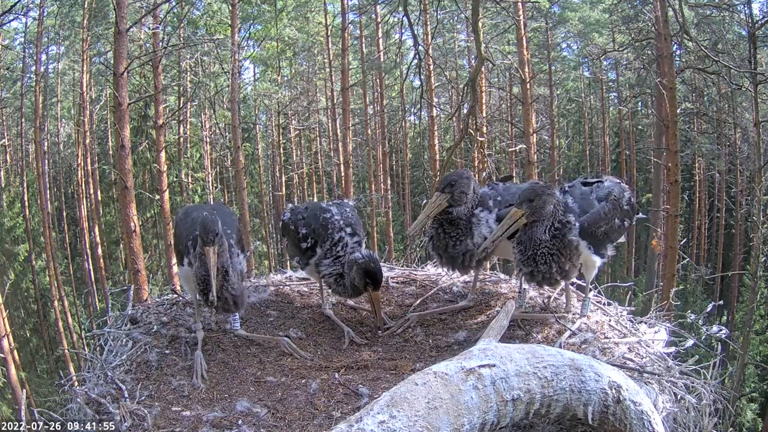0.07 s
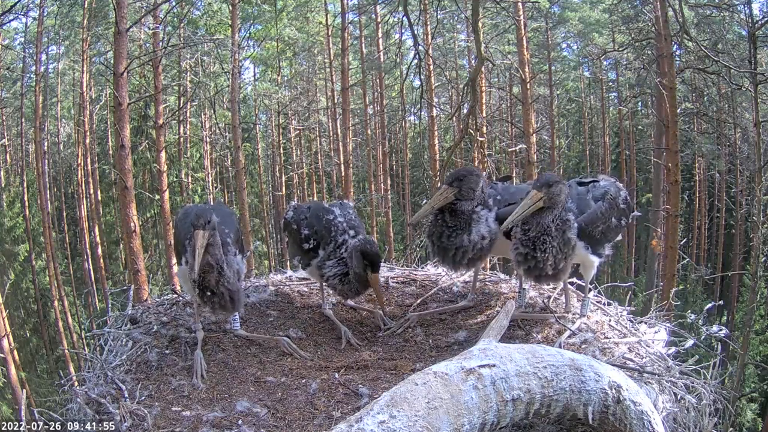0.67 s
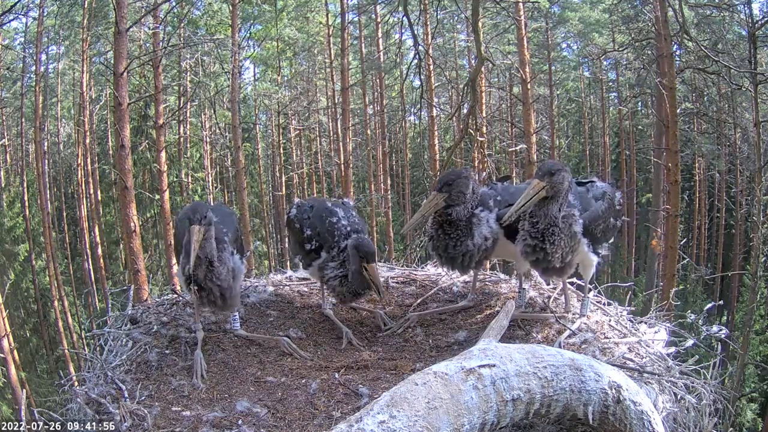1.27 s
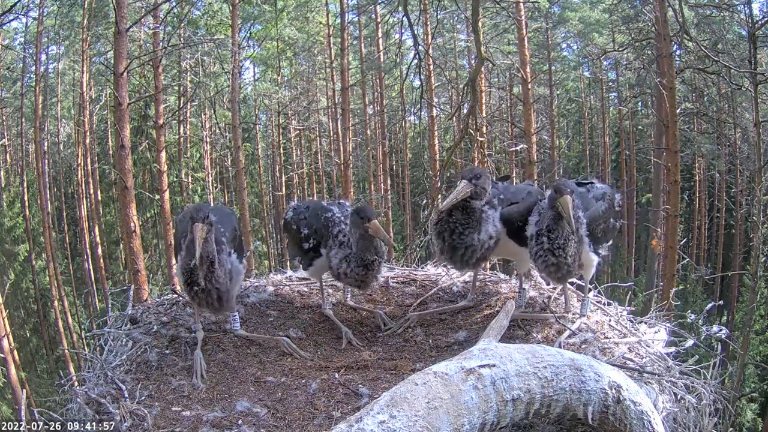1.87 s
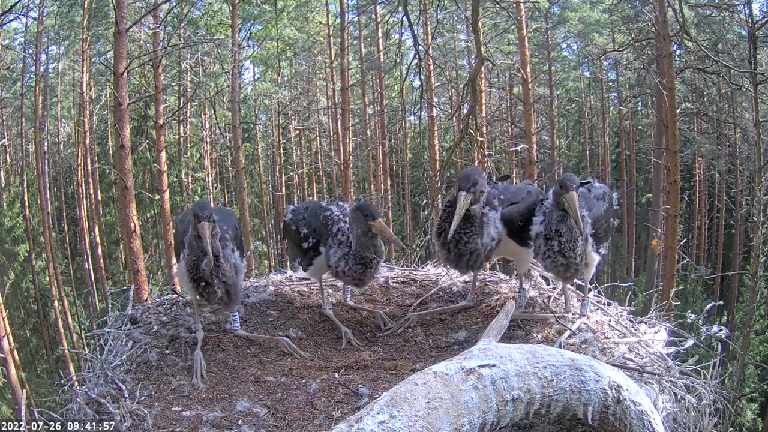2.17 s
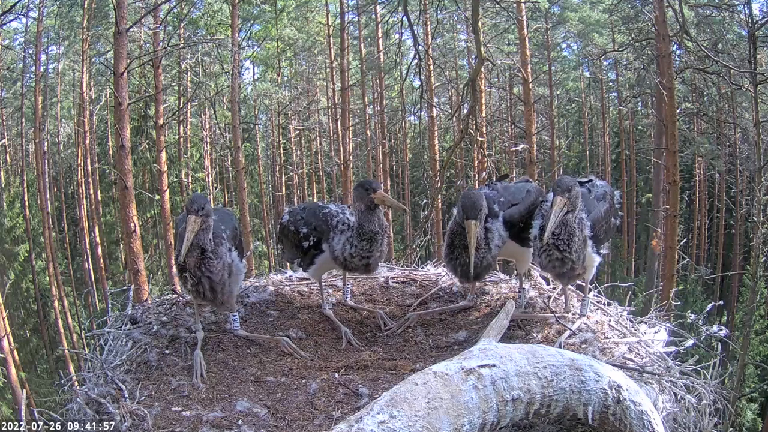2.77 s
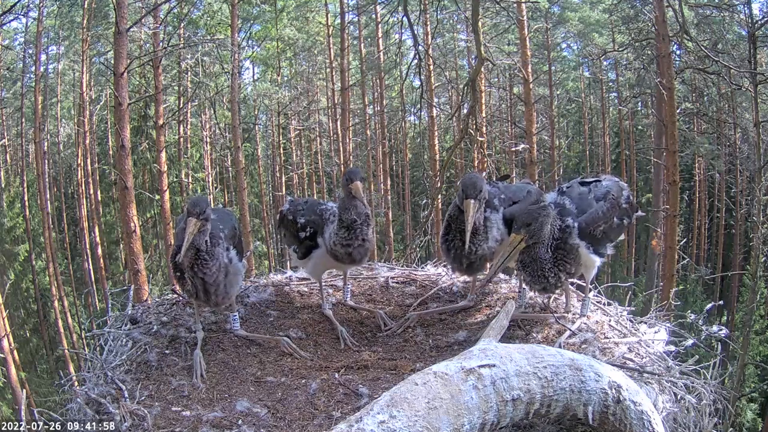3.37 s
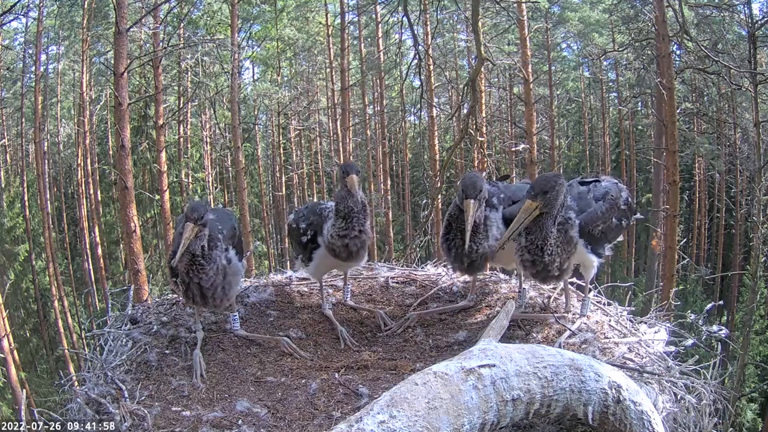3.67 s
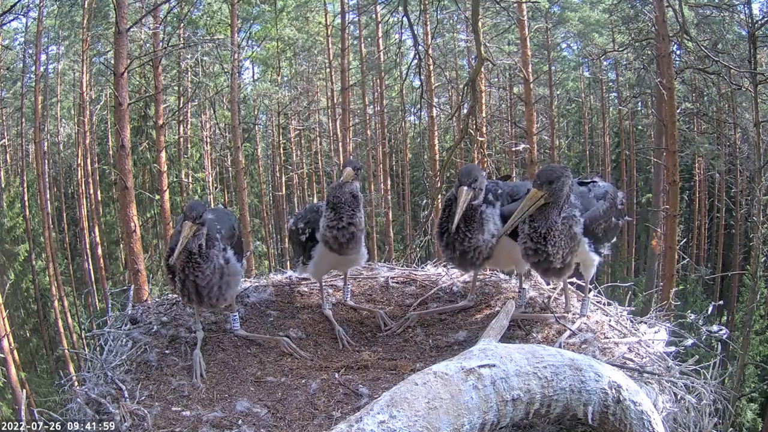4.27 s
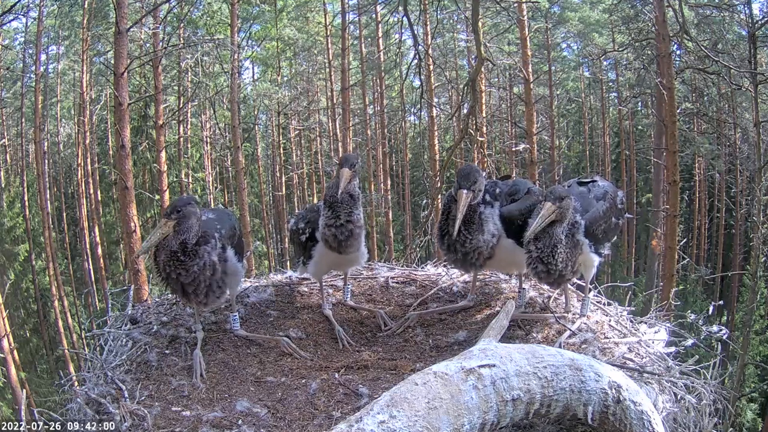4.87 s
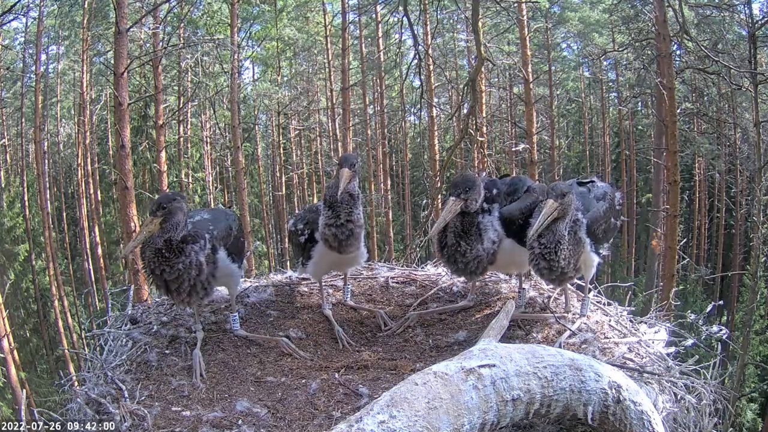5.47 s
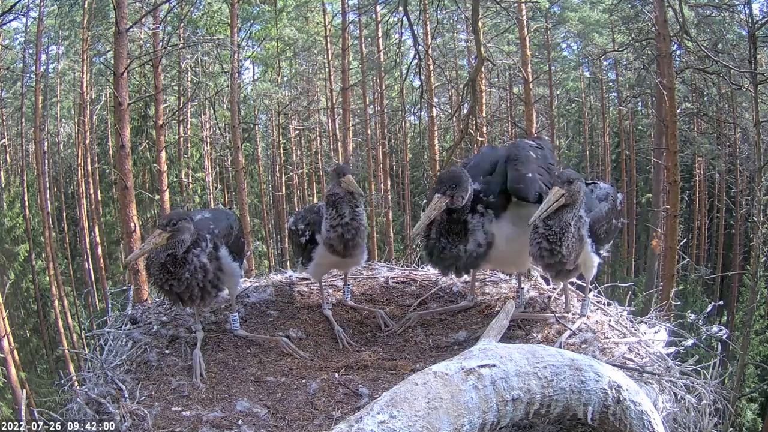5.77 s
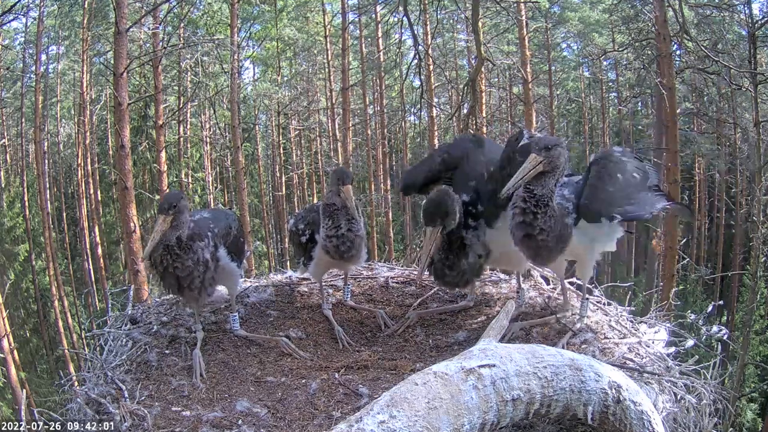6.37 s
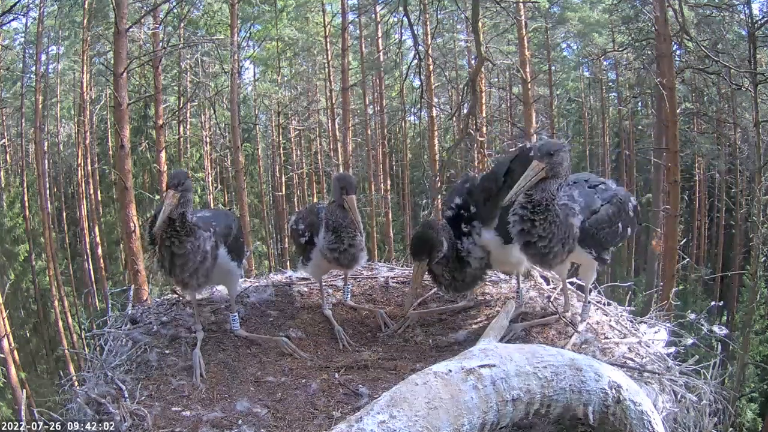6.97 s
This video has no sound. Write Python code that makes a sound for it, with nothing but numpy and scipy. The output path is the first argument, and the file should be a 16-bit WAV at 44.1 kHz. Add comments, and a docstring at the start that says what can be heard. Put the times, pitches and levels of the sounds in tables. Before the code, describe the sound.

Two black stork chicks beg close by on a stick nest, giving a high, hoarse chitter of quick whistled flicks and arching squeaks, about ten syllables a second. After a short call at the start, bouts run from about 0.4 to 1.3 seconds, 1.5 to 2.5, 2.7 to 3.5, 3.8 to 4.5, and 4.7 to 6.6. They tend to open with a tiny grunt and end in a short creaky croak. A twig snaps lightly around 2.6 seconds. At about 5.7 seconds a chick gives a very brief falling squeal, and wings flap several times with a feathery rustle and soft puffs, knocking the sticks hardest near 6 seconds. The calling stops around 6.6, leaving small twig taps and one last grunt at 7 seconds. Faint echoes return from the trees over quiet, steady forest air and a barely audible low hum.

```python
"""A hoarse, whistled chitter comes first: two black stork chicks beg on a stick nest in a quiet pine
forest. Bouts tend to open with a grunt, run on in fast flicks and arches, and end in a creaky croak.
One side of the syrinx whistles while the other modulates it; grunts and croaks are pulse trains that
ring the chest and throat. Sticks are knocked now and then, and late on a chick squeals and wings flap
and strike the twigs. The trunks return faint echoes over steady air and a low hum."""
import sys
import numpy as np
from scipy import signal
from scipy.fft import rfft, irfft
from scipy.io import wavfile
from scipy.ndimage import uniform_filter1d

SR = 44100
rng = np.random.default_rng(int(sys.argv[2]) if len(sys.argv) > 2 else 0)


def file_out(sig):
    """Save sig as 16-bit WAV at sys.argv[1]."""
    # one column per channel
    cols = np.atleast_2d(sig).T
    # limit, then scale
    lim = np.clip(cols, -1, 1)
    pcm = np.round(lim * 32767).astype(np.int16)
    wavfile.write(sys.argv[1], SR, pcm)


N = 309582
TIME = np.arange(N) / SR

# Event levels are relative: each source applies its own gain and envelope.
# unbroken stretches of hoarse calling: start t/s, end t/s, level/dB
HOARSE_SPANS = [(-.02, 0.111, -43), (0.104, 0.24, -61.5), (0.442, 0.755, -45.5), (0.75, 1.124, -41.5),
                (1.154, 1.253, -42), (1.475, 1.664, -44.5), (1.647, 2.159, -44), (2.161, 2.335, -41),
                (2.378, 2.439, -40.5), (2.703, 3.404, -42.5), (3.427, 3.5, -43), (3.765, 4.462, -40),
                (4.774, 4.844, -46), (4.865, 4.944, -45.5), (4.966, 5.062, -40.5), (5.039, 5.445, -39.5),
                (5.415, 5.794, -45.5), (5.793, 5.976, -49), (5.972, 6.636, -45.5)]
# arched whistles: start t/s, length/s, top f/Hz, level/dB
ARCHED_WHISTLES = [(0, 0.058, 3296, -41.5), (0.108, .028, 4050, -67), (0.173, 0.02, 3130, -57),
                   (0.18, 0.0344, 4170, -61), (0.462, 0.042, 4070, -39), (0.537, 0.044, 4070, -38.5),
                   (0.599, 0.041, 3700, -45.5), (0.633, 0.061, 4190, -39.5), (0.735, 0.045, 4100, -36.5),
                   (0.842, 0.051, 4150, -37), (0.945, 0.052, 4180, -39.5), (1.117, 0.032, 6100, -72),
                   (1.525, .048, 4050, -46), (1.567, 0.049, 3860, -40), (1.646, 0.079, 4030, -37),
                   (1.72, 0.041, 3520, -38), (1.784, 0.048, 3860, -39), (1.828, 0.036, 3680, -38.5),
                   (1.935, .03, 3730, -42), (1.975, .05, 5750, -59), (2.073, 0.049, 5640, -58.5),
                   (2.029, 0.045, 3830, -38.5), (2.729, 0.028, 3950, -52), (2.781, 0.025, 4000, -40),
                   (2.808, 0.024, 4000, -41), (2.913, 0.036, 4140, -41), (2.993, 0.063, 4230, -42.5),
                   (3.108, 0.05, 4180, -39), (3.171, 0.046, 3690, -39.5), (3.217, 0.037, 4000, -38),
                   (3.282, 0.025, 3670, -39), (3.788, 0.038, 4140, -36.5), (3.87, 0.027, 3830, -41),
                   (3.962, 0.039, 4180, -38), (4.074, 0.052, 4170, -39), (4.186, .034, 4250, -38.5),
                   (4.279, .045, 4275, -37.5), (4.377, 0.027, 3980, -44), (4.399, 0.03, 3086, -39),
                   (4.414, 0.042, 3820, -43.5), (5.135, 0.035, 4130, -44), (5.233, 0.043, 4060, -40.5),
                   (5.334, 0.056, 4120, -37.5), (5.396, 0.057, 3770, -39.5), (5.441, 0.054, 4800, -44),
                   (5.494, 0.061, 3950, -35.5), (5.541, 0.068, 5200, -49), (5.594, 0.042, 4180, -35.5),
                   (5.711, 0.032, 4120, -36), (5.746, .036, 2960, -41.5), (5.904, 0.022, 4300, -34.5),
                   (5.93, 0.026, 4440, -34), (6.225, 0.046, 5250, -53), (6.3, 0.053, 4000, -34),
                   (6.316, 0.06, 5200, -49), (6.413, 0.053, 3980, -35.5), (6.415, 0.065, 5350, -50),
                   (6.601, 0.04, 3660, -50)]
# croaks, from slow creaks to soft coos: start t/s, length/s, first and last pulse rate f/Hz, level/dB
CROAK_CALLS = [(0.049, 0.049, 396, 276, -43.5), (.136, 0.038, 1315, 964, -51), (0.238, .02, 410, 250, -61),
               (0.824, 0.031, 1183, 990, -52.5), (0.927, 0.031, 1360, 1105, -48),
               (1.018, 0.031, 1200, 1020, -55), (1.201, 0.081, 603, 403.6, -54),
               (1.25, 0.021, 427, 324, -45.5), (1.281, 0.0036, 352, 330, -42.5),
               (2.426, .027, 392, 276, -43), (2.458, 0.0097, 380, 377, -46), (2.84, 0.033, 607, 536, -53),
               (3.303, 0.027, 1180, 1125, -51), (3.485, 0.041, 382, 265, -45), (3.865, .016, 570, 527, -50),
               (4.369, 0.043, 478, 325, -50), (4.457, 0.042, 586, 478, -49), (4.483, 0.041, 374, 281, -51),
               (4.789, 0.026, 588, 514, -49.5), (4.877, 0.012, 570, 547, -51.5),
               (5.801, 0.039, 587, 489, -45.5), (6.511, 0.08, 577, 536, -49.5)]
# blows of bills, feet and wings on the sticks: t/s, wood level/dB, snap level/dB
NEST_BLOWS = [(0.419, -60.5, -84), (2.582, -56, -54.5), (2.657, -63.5, -91), (5.866, -41.5, -50.5),
              (5.884, -44, -61), (6.045, -36, -48), (6.241, -44.5, -56), (6.483, -47, -74),
              (6.607, -54.5, -62), (6.666, -57.5, -80), (6.819, -64.5, -58), (6.843, -65.5, -64.5),
              (6.902, -58.5, -80), (6.971, -59.5, -72)]
# grunts, mostly opening a bout: start t/s, length/s, level/dB, throat level over chest/dB
GRUNT_CALLS = [(0.432, 0.017, -43.5, -17), (0.504, 0.0076, -39.5, -15), (1.46, 0.02, -43, -4.5),
               (1.618, 0.028, -45, -21), (1.798, 0.013, -46, -7), (2.335, 0.026, -51.5, 2.5),
               (2.695, .02, -43, -5.5), (2.768, 0.02, -43.5, -17), (3.756, 0.025, -42.5, -4.5),
               (3.787, 0.028, -44.5, -5), (4.423, .023, -46, -1.5), (4.722, 0.016, -44.5, -4.5),
               (5.02, 0.031, -44.5, -17), (5.386, 0.028, -44, 5), (5.738, 0.012, -44, -4),
               (6.113, .024, -41, -9), (6.987, 0.028, -43.5, -4)]
# syllables of two downward flicks: first flick t/s, time to the second/s, first and second level/dB
SYLLABLES = [(.492, 0.032, -37.5, -40.5), (0.57, 0.036, -36, -35.5), (0.654, 0.052, -38, -35),
             (.756, 0.046, -36.5, -34.5), (.859, 0.06, -36.5, -36.5), (.957, 0.054, -36, -33),
             (1.053, 0.061, -35.5, -35.5), (1.157, 0.06, -36, -50), (1.494, 0.017, -38, -36.5),
             (1.68, 0.033, -33.5, -36.5), (1.767, 0.054, -35, -34.5), (1.872, .053, -36, -35),
             (1.976, .022, -32, -41), (2.014, 0.013, -32.5, -34), (2.08, 0.046, -36.5, -32),
             (2.186, .051, -34.5, -36.5), (2.285, 0.052, -41.5, -30.5), (2.384, 0.042, -34, -50.5),
             (2.727, 0.062, -35.5, -53), (2.834, 0.044, -34.5, -44), (2.953, 0.022, -35.5, -37),
             (3.026, 0.05, -38, -34), (3.126, 0.036, -40.5, -35.5), (3.23, 0.044, -36, -37.5),
             (3.344, .041, -44.5, -38.5), (3.437, 0.03, -38, -62.5), (3.85, 0.058, -37, -35),
             (3.984, 0.025, -37.5, -39), (4.037, 0.044, -37.5, -34.5), (4.138, 0.041, -36, -34),
             (4.234, 0.039, -34, -40), (4.336, 0.036, -38, -42.5), (4.783, .037, -43.5, -37.5),
             (4.874, .048, -42, -39.5), (4.976, 0.041, -45.5, -38.5), (5.062, 0.039, -28.5, -33.5),
             (5.122, 0.066, -35.5, -35.5), (5.21, 0.013, -37.5, -34.5), (5.275, 0.056, -38.5, -33.5),
             (5.643, 0.068, -27.5, -50.5), (5.802, .03, -41, -43.5), (5.887, 0.048, -31.5, -33),
             (5.988, 0.047, -40, -33.5), (6.083, .048, -35.5, -31.5), (6.178, .051, -34, -31),
             (6.272, 0.052, -34.5, -36.5), (6.368, .031, -31.5, -33), (6.473, 0.057, -37, -43.5),
             (6.572, 0.014, -40, -60)]
# wing strokes: fastest moment t/s, feather rustle level/dB, air push level/dB
WING_STROKES = [(5.735, -57.5, -61), (5.875, -50, -51), (6.035, -52, -53), (6.13, -64, -63),
                (6.25, -56, -58.5), (6.61, -77, -66)]

# Frequency responses, each with the columns f/Hz, level/dB:
RASP_RESPONSE = [(200, -45.5), (550, -24.5), (1100, -12), (1600, -6.5), (2300, -10), (2950, -4.5),
                 (4100, -4), (4550, -11), (5250, -19), (6000, -10.5), (7200, -31), (12500, -35),
                 (16000, -48)]  # vocal tract in a hoarse call
FOREST_RESPONSE = [(20, 5.5), (50, 0.5), (110, -3.5), (380, -6.5), (630, -10.5), (1000, -2.5),
                   (1700, -14.5), (2600, -11.5), (3800, -14.5), (5000, -20), (6500, -17), (13000, -19.5),
                   (16000, -21)]  # air in the pines
CHEST_RESPONSE = [(50, -33.5), (180, -6.5), (350, -14), (530, -7), (650, 2.5), (790, -2), (960, 1.5),
                  (1150, -3.5), (1400, -11.5), (2000, -11.5), (2900, -23.5), (5000, -51)]  # low chest resonances
THROAT_RESPONSE = [(900, -47.5), (1700, -13), (2230, -7), (2550, 0), (2920, -1), (3100, -8), (3280, -3),
                   (3750, -10.5), (4080, -11), (4450, -26), (5200, -28.5), (6500, -43.5), (16000, -54)]  # bright throat resonances
AIR_RESPONSE = [(20, -4), (70, -4.5), (200, -1.5), (400, -1.5), (900, -6), (3000, -51)]  # dull puff or thud
WOOD_RESPONSE = [(100, -18.5), (400, -19), (700, -4), (1000, -0.5), (1400, -4), (2200, -11.5), (3500, -15),
                 (5500, -22), (12000, -72)]  # clattering sticks
SNAP_RESPONSE = [(600, -18), (2000, 10.5), (4000, 14.5), (6500, 0.5), (11000, 6.5), (16000, -2)]  # dry snap of a twig
FEATHER_RESPONSE = [(200, -25), (500, 6), (950, 15.5), (1600, 9.5), (3500, 13), (6000, -4.5), (9000, -7),
                    (13000, -5), (16000, -17)]  # scraping feathers


def amp(db):
    """Amplitude ratio of a level in decibels."""
    return 10 ** (np.asarray(db) / 20)


def unit_rms(x):
    """Normalisation to unit mean power."""
    return x / np.sqrt(np.mean(x ** 2) + 1e-20)


def add(mix, start, sound):
    """Superposition of a sound on the mix, from a start time in seconds."""
    part = mix[max(round(start * SR), 0):][:len(sound)]
    part += sound[:len(part)]


def gate(start, end, attack, release):
    """Trapezoidal envelope: linear attack, hold and linear release between two times."""
    return np.clip(np.minimum((TIME - start) / attack, (end - TIME) / release), 0, 1)


def wander(count, hz):
    """Low-passed Gaussian noise: smooth random motion of rms near 1, up to about hz."""
    padded = count + 4096
    lowpass = np.exp(-(np.fft.rfftfreq(padded, 1 / SR) / hz) ** 2)
    return unit_rms(irfft(rfft(rng.standard_normal(padded)) * lowpass))[:count]


def phase(hz):
    """Phase as the time integral of frequency, from a random start."""
    return 2 * np.pi * (np.cumsum(hz) / SR + rng.random())


def ring(response, size=2048):
    """Minimum-phase impulse response: the phase follows from the log gain by Hilbert transform."""
    hz, db = np.transpose(response)
    log_hz = np.log(abs(np.fft.fftfreq(size, 1 / SR)) + 1)
    log_gain = np.log(amp(np.interp(log_hz, np.log(hz), db)))
    return np.fft.ifft(np.exp(np.conj(signal.hilbert(log_gain)))).real[:size // 2]


def colour(x, response):
    """Linear filtering by convolution, keeping the length of x."""
    return signal.oaconvolve(x, ring(response))[:len(x)]


def hoarseness(centre_hz=3350, lurch_hz=100, chop_hz=640, push_db=2.5, level_db=-0.76):
    """Roughness by modulation: a whistle lurches in pitch and is chopped by uneven low pulses."""
    in_syllable = np.zeros(N)
    for first, span, *_ in SYLLABLES:
        add(in_syllable, first, np.ones(round(span * SR)))
    effort = sum(amp(db) * gate(start, end, 0.0096, 0.019) for start, end, db in HOARSE_SPANS)
    effort *= amp(push_db * uniform_filter1d(in_syllable, size=600))  # swells under each syllable
    chop = np.exp(np.cos(phase(chop_hz * (1 + 0.24 * wander(N, 150)))))
    pitch = centre_hz * (1 + .16 * np.tanh(wander(N, lurch_hz)))
    tone = unit_rms(np.sin(phase(pitch)))
    breath = .1 * rng.standard_normal(N)
    gurgle = 0.19 * amp(14.8 * np.tanh(wander(N, 32)))
    flutter = amp(6.3 * np.tanh(wander(N, 145)))
    drive = chop * (tone + breath + gurgle) * flutter
    return amp(level_db) * effort * unit_rms(colour(drive, RASP_RESPONSE))


def whistle(hz, jitter, flutter_db, buzz, low_hz=1100):
    """Biphonation: the low side of the syrinx puts sidebands on the high side. Returns both voices."""
    n = len(hz)
    high = phase(hz * (1 + jitter * wander(n, 269)))
    low_glide = low_hz * rng.uniform(.8, 1.25) * np.linspace(1.14, .88, n)
    low = phase(low_glide * (1 + 0.0534 * wander(n, 104)))
    undertone = np.sin(low) + 0.11 * np.sin(low / 2)  # strong and weak cycles alternate
    undertone *= amp(5 * np.tanh(wander(n, 90)))
    undertone = unit_rms(undertone * signal.windows.tukey(n, .7))
    sidebands = colour(buzz * (undertone + 0.31 * np.sin(2 * low)) * np.sin(high), RASP_RESPONSE)
    fray = wander(n, 820) + .5 * undertone  # the buzz frays the overtones into a soft hiss
    overtones = amp(-44) * fray * (np.sin(2 * high) + np.sin(3 * high))
    flutter = amp(flutter_db * np.tanh(2 * wander(n, 212)))
    return np.sqrt(2) * (np.sin(high) + overtones + sidebands) * flutter, undertone


def arches(rest_hz=3650, strain_hz=4300, under_db=-25, upper_db=-24, overtone_db=-43):
    """Parabolic frequency glides: one chick's whistles rise and fall; the highest arch and strain most."""
    out = np.zeros(N)
    for start, length, top_hz, db in ARCHED_WHISTLES:
        u = np.linspace(-1, 1, round(length * SR))
        drop_hz = np.clip(1.5 * (top_hz - rest_hz), 100, 1065)
        hz = top_hz - drop_hz * u ** 2
        tension = min(1 + 3 * max(top_hz / strain_hz - 1, 0) ** .5, 4)
        voice, undertone = whistle(hz, jitter=0.01 * tension, flutter_db=3.4, buzz=0.3 * tension)
        upper_hz = np.minimum(hz + 1150 * rng.uniform(0.84, 1.1), 6000)  # a faint upper sideband
        upper = amp(upper_db) * np.sin(phase(upper_hz + 60 * wander(len(u), 200)))
        overtone_gain = amp(overtone_db + 4 * rng.standard_normal())
        overtones = overtone_gain * (np.sin(phase(2 * hz)) + np.sin(phase(3 * hz)))
        call = unit_rms(voice) + upper + overtones + amp(under_db) * undertone
        add(out, start, amp(db) * call * signal.windows.tukey(len(u), .22))
    return out


def forest(air_db=-69, hum_hz=67, hum_db=-81):
    """Ambient noise floor: faint broadband air in the pines and a low wavering hum."""
    air = colour(rng.standard_normal(N), FOREST_RESPONSE) * amp(1.3 * wander(N, 10))
    hum = np.sin(phase(hum_hz * (1 + .05 * wander(N, 23))))
    return amp(air_db) * unit_rms(air) + amp(hum_db) * unit_rms(hum)


def trunk_echoes(x, t60=0.96, echoes_per_s=2000, dull_hz=2500):
    """Scattering and absorption: the trunks return thin echoes, dulled by the needles."""
    t = TIME[:SR // 2]
    taps = rng.standard_normal(len(t)) * (rng.random(len(t)) < echoes_per_s / SR)
    taps *= np.exp(-np.log(1000) * t / t60)
    taps = signal.lfilter(*signal.butter(1, dull_hz, fs=SR), taps / np.linalg.norm(taps))
    return amp(-30) * signal.oaconvolve(x, taps)[:N]


def syrinx_pulses(length, first_hz, last_hz, rough):
    """A slowing pulse train with jitter and shimmer: rough calls burst and die away, clean ones swell."""
    n = max(round(length * SR), 2)
    hz = np.geomspace(first_hz, last_hz, n) * np.exp(.3 * rough * wander(n, 400))
    cycle = np.floor(np.cumsum(hz) / SR)
    onsets = np.flatnonzero(np.diff(cycle, prepend=-1))
    burst = np.exp(-1.3 * onsets / n)
    swell = 0.49 + np.sin(np.pi * onsets / n)
    shimmer = amp(5 * (rough + 0.94) * rng.uniform(-0.57, 1, len(onsets)))
    pulses = np.zeros(n)
    pulses[onsets] = (rough * burst + (1 - rough) * swell) * shimmer
    pulses[0] = max(pulses[0], rough * pulses.max())  # a rough call starts with a pop
    return pulses


def vocal_tract(pulses, bright_db):
    """Source and filter: the pulses ring the low chest and the bright throat in parallel."""
    chest = signal.fftconvolve(pulses, ring(CHEST_RESPONSE))
    throat = signal.fftconvolve(pulses, ring(THROAT_RESPONSE))
    voice = chest / np.linalg.norm(chest) + amp(bright_db) * throat / np.linalg.norm(throat)
    return np.sqrt(len(pulses)) * voice


def croaks(creak_hz=474, bright_db_per_octave=-7.5, level_db=.5):
    """Nearly periodic excitation: slow pulses give a bright creak, fast ones a dull coo."""
    out = np.zeros(N)
    for start, length, first_hz, last_hz, db in CROAK_CALLS:
        bright_db = bright_db_per_octave * np.log2(first_hz / creak_hz) - 0.5
        pulses = syrinx_pulses(length, first_hz, last_hz, rough=0.14)
        add(out, start, amp(db + level_db) * vocal_tract(pulses, bright_db))
    return out


def knocks(thud_db=-11.5, doubling_db=19, level_db=8):
    """Damped vibration after impact: a dull thud, a short clatter of sticks and a dry snap."""
    out, t = np.zeros(N), TIME[:SR // 6]
    for start, wood_db, snap_db in NEST_BLOWS:
        t60 = 0.036 * 2 ** ((wood_db + 50) / doubling_db)  # harder blows shake more sticks, ring longer
        for response, db, decay in ((AIR_RESPONSE, wood_db + thud_db, t60),
                                    (WOOD_RESPONSE, wood_db, t60),
                                    (SNAP_RESPONSE, snap_db, 0.72 * t60)):
            body = ring(response)
            clatter = rng.standard_normal(len(t)) * np.exp(-np.log(1000) * t / decay)
            add(out, start, amp(db + level_db) * signal.fftconvolve(clatter, body / np.linalg.norm(body)))
    return out


def grunts(first_hz=491, sag=.8):
    """Aperiodic excitation: short bursts of uneven pulses ring the chest and throat."""
    out = np.zeros(N)
    for start, length, db, bright_db in GRUNT_CALLS:
        pulses = syrinx_pulses(length, first_hz, first_hz * sag, rough=.8)
        add(out, start, amp(db) * vocal_tract(pulses, bright_db))
    return out


def chitters(entry_hz=4450, shoulder_hz=4100, exit_hz=4550, under_db=-26, hum_hz=570, hum_db=-60):
    """Fast frequency modulation: the other chick's pitch dives, holds, dives again and shoots up."""
    out = np.zeros(N)
    for first, span, first_db, second_db in SYLLABLES:
        t = np.arange(first - .007, first + span + .012, 1 / SR)
        n = len(t)
        knots = [t[0], *(first + span * np.array([0, .14, .35, .62, .83, 1])), t[-1]]
        dive_hz = 3050 + 130 * rng.standard_normal(2)  # each dive is a loud flick
        mean_db = (first_db + second_db) / 2
        held_hz = 3565 + 44 * (mean_db + 36) + 106 * rng.uniform(-0.97, 1)  # lower in weak syllables
        hz = np.interp(t, knots, [entry_hz, dive_hz[0], shoulder_hz, held_hz + 90,
                                  held_hz - 90, shoulder_hz, dive_hz[1], exit_hz])
        db = np.interp(t, knots, [first_db - 2, first_db, first_db - 2, mean_db - 15.5,
                                  mean_db - 2, second_db - 3, second_db, second_db - 2])
        db -= 11 * np.clip((hz - 4250) / 400, 0, 1)  # the throat passes little above its top resonance
        voice, undertone = whistle(uniform_filter1d(hz, size=90), jitter=0.0236, flutter_db=5, buzz=0.43)
        call = (voice + amp(under_db) * undertone) * amp(db) * signal.windows.tukey(n, .17)
        hum_pitch = hum_hz * np.linspace(1.08, .92, n) * (1 + 0.038 * wander(n, 80))
        chest_hum = amp(hum_db) * np.sin(phase(hum_pitch)) * np.hanning(n)
        add(out, t[0], call + chest_hum)
    return out


def squeal(start=5.662, length=.036, top_hz=5400, last_hz=3900, level_db=-35, swell_db=16):
    """A power-law glide: one excited note hangs at the top, then falls ever faster as it grows louder."""
    u, out = np.linspace(0, 1, round(length * SR)), np.zeros(N)
    voice, _ = whistle(top_hz + (last_hz - top_hz) * u ** 5, jitter=0.0074, flutter_db=3.5, buzz=0.32)
    envelope = amp(level_db - swell_db * (1 - u) ** 2) * signal.windows.tukey(len(u), .2)
    add(out, start, voice * envelope)
    return out


def wings(rise_s=.04, fall_s=.042, grains_per_s=1500, rustle_db=4, air_db=-2):
    """Friction and air displacement: feathers scrape in tiny grains and each stroke pushes a soft puff."""
    rustle = amp(-59) * gate(5.68, 6.72, attack=0.087, release=0.49)  # open wings keep brushing
    push = amp(-10) * rustle
    for peak, scrape_db, push_db in WING_STROKES:
        speed = np.exp(-np.maximum((peak - TIME) / rise_s, (TIME - peak) / fall_s))
        rustle = np.hypot(rustle, amp(scrape_db) * speed)  # incoherent sounds add in power
        push = np.hypot(push, amp(push_db) * speed)
    grains = (rng.random(N) < grains_per_s / SR) * rng.standard_normal(N)
    grains *= amp(5 * np.minimum(rng.exponential(1, N), 4))  # a few grains stand out
    scrape = unit_rms(colour(unit_rms(grains) + 1.45 * rng.standard_normal(N), FEATHER_RESPONSE))
    puff = unit_rms(colour(rng.standard_normal(N), AIR_RESPONSE))
    return amp(rustle_db) * rustle * scrape + amp(air_db) * push * puff


def scene():
    """Superposition: direct sound from the nearby nest, its faint echoes and the forest."""
    nest = hoarseness() + arches() + croaks() + knocks() + grunts() + chitters() + squeal() + wings()
    return (nest + trunk_echoes(nest) + forest())[None]


def record(dry, edge_hz=15800):
    """Band limiting: a linear-phase low-pass filter removes the highest treble."""
    lowpass = signal.firwin(511, edge_hz, window=("kaiser", 9), fs=SR)
    return signal.oaconvolve(dry, lowpass[None], "same")


dry = scene()
out = record(dry)
file_out(out)
```